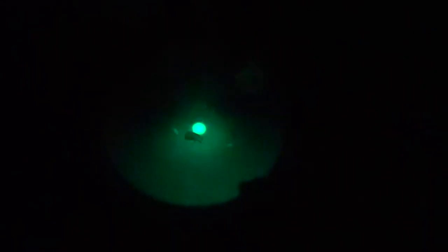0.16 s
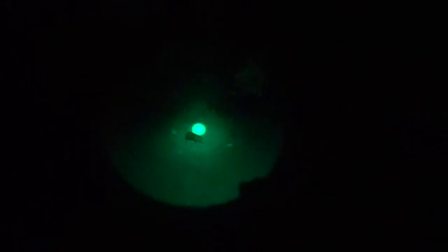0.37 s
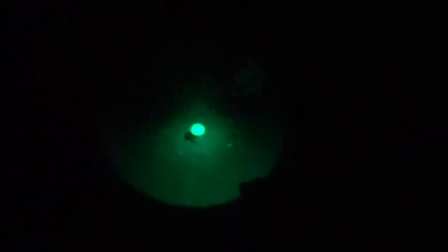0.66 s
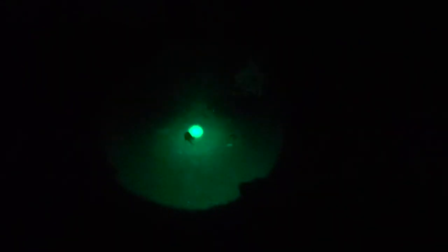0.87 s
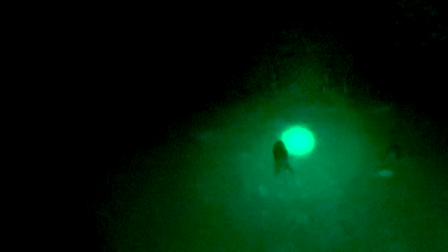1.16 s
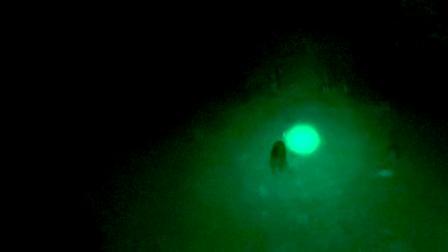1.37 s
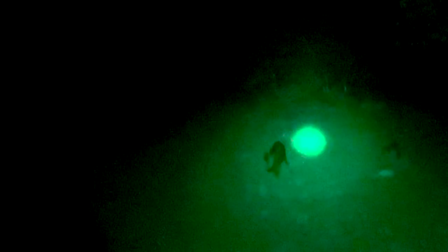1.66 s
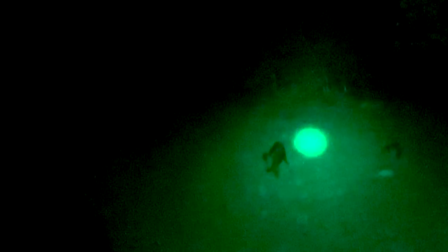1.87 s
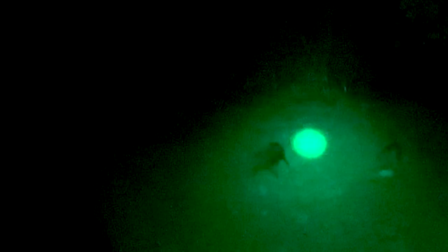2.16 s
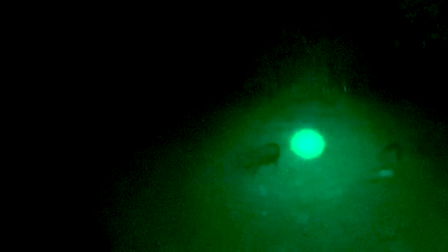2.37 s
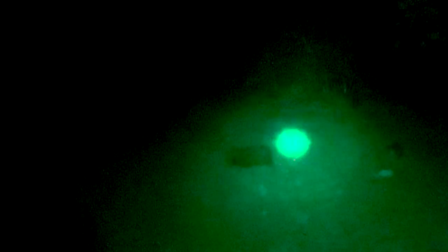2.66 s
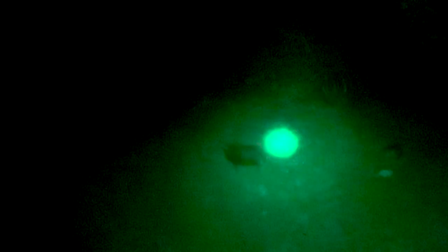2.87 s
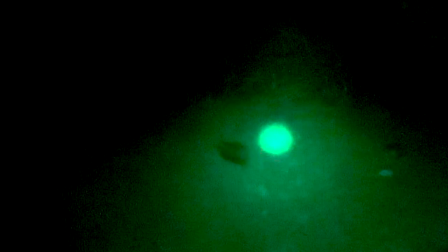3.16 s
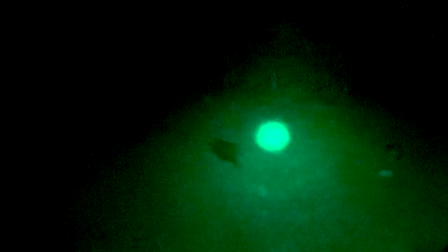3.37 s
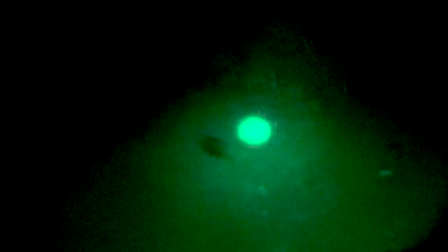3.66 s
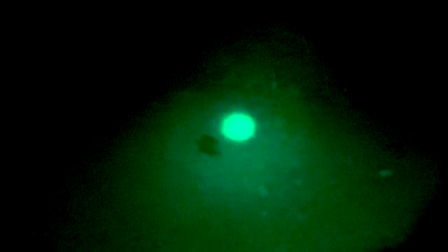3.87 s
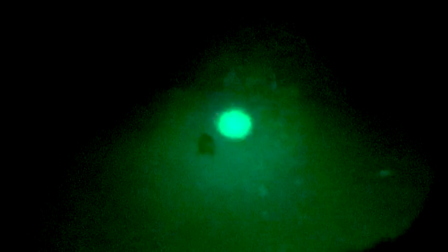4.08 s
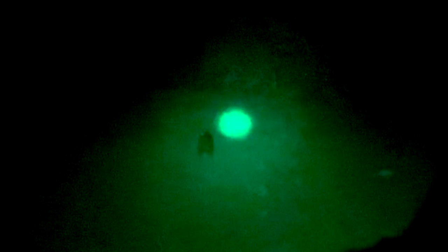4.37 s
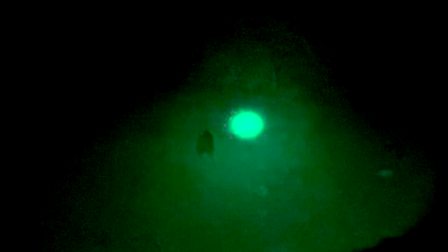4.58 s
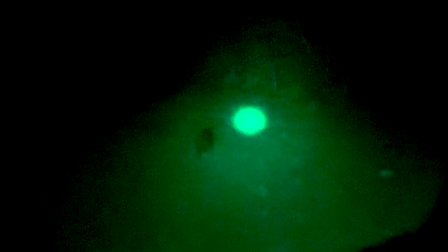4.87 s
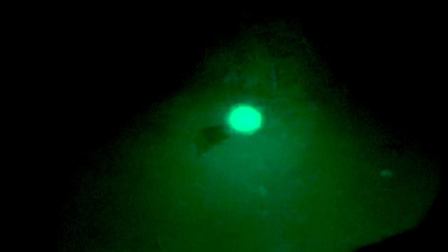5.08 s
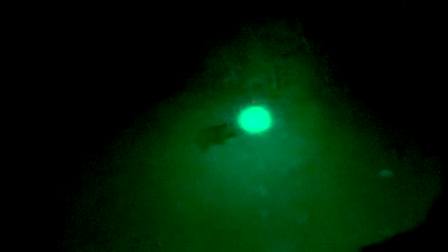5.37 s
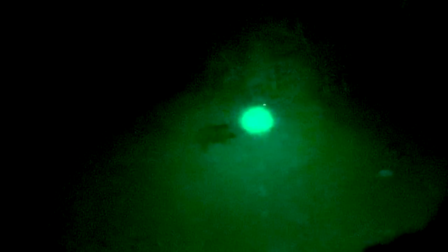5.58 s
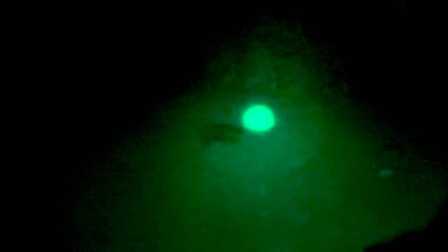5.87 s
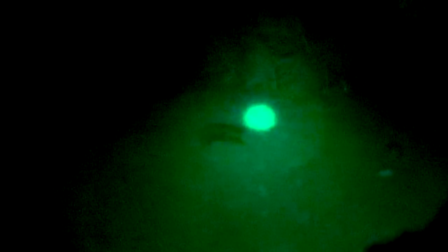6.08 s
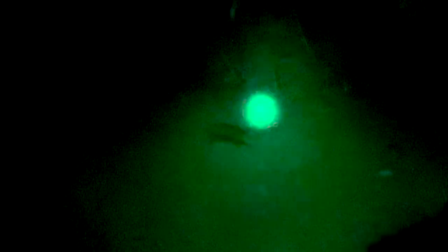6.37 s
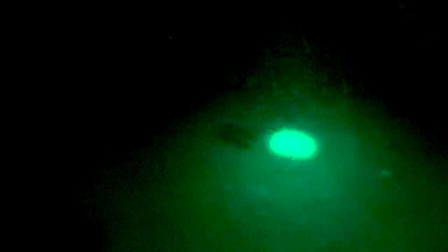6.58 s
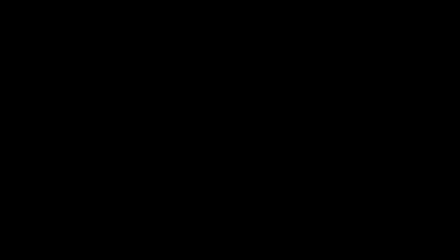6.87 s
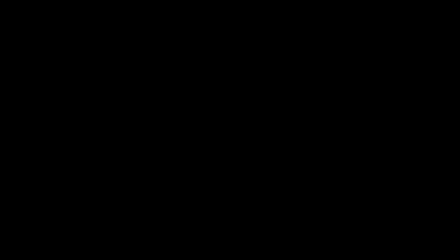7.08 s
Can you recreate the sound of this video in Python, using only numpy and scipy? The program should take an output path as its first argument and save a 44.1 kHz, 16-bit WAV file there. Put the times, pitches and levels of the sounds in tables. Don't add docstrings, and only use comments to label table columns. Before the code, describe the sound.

Stereo outdoor sound, mostly very quiet: dry leaf rustles, small crunches, low hoof scuffs and occasional breathy grunts beneath faint insects and distant rumble. A twig breaks crisply. Near the end comes a huge bright bow release with clattering limbs right beside the microphone, then a slightly farther shaft crack and dull flank thud, then three rapid, rising, rough whistling squeals with short woodland reverberation and startled hooves.

```python
import sys
import numpy as np
from scipy import signal
from scipy.fft import rfft, irfft, next_fast_len
from scipy.io import wavfile
from scipy.ndimage import uniform_filter1d

SR = 44100
rng = np.random.default_rng(int(sys.argv[2]) if len(sys.argv) > 2 else 0)


def dump_mix(stems):
    frames = np.atleast_2d(stems).T
    limited = np.clip(frames, -1, 1)
    pcm = np.round(limited * 32767).astype(np.int16)
    wavfile.write(sys.argv[1], SR, pcm)


def invert_db(x):
    u = np.asarray(x, float) / 20
    return 10 ** u


N = 318385
SIZE = next_fast_len(N + SR)
HZ = np.maximum(np.arange(SIZE // 2 + 1) * SR / SIZE, 1)

# start_s, snap_db, limb_blow_db
BOW = [
    (6.3425, -5.5, -36),
    (6.3445, -14, -46),
    (6.3575, -6, -18),
    (6.36, -16, -31),
    (6.364, -7, -13),
    (6.3665, -7, -4.5),
    (6.372, -30, -13),
    (6.3785, -30, -16.5),
    (6.385, -46, -35),
    (6.389, -21, -12),
]
# pitch_hz, level_db, t60_s
LIMB_MODES = [(165, -18.5, .05), (215, -18.0, .1), (232, -29.0, .26), (300, -23.0, .035), (505, -13.0, .06),
              (595, -10.5, .052), (660, -18.0, .04), (760, -14.0, .04), (840, -12.0, .055),
              (1160, -24.0, .03), (1500, -16.0, .018)]
# pitch_hz, width_hz, level_db
SNAP_BANDS = [(2400, 1400, 2.5), (6440, 1100, 1), (8170, 1900, 0), (15200, 1100, -6), (13400, 3000, -25)]
# start_s, snap_db, thud_db
STRIKE = [
    (6.5562, -15, -18),
    (6.561, -47.5, -8),
    (6.565, -46, -16.5),
    (6.5685, -40, -13),
    (6.575, -29, -25),
    (6.606, -35, -21.5),
]
# pitch_hz, width_hz, level_db
SHAFT_BANDS = [(1800, 640, -4.5), (4200, 900, -0.5), (6340, 800, 2), (7300, 1000, 4.5), (8760, 1450, -1.5),
               (15000, 1300, -10)]
# pitch_hz, level_db, t60_s
FLANK_MODES = [(115, -7.5, 0.055), (350, -25, .02), (173, -23, 0.0085), (256.5, -10, 0.071),
               (440, -16, 0.0051), (595, -16, 0.014)]
# start_s, pitch_hz, level_db
WHISTLE = [
    [(6.632, 1600, -75.5), (6.652, 1810, -10), (6.667, 1881, -5.5), (6.686, 2000, -2.5), (6.7, 2130, -4.5),
     (6.735, 2256, -10.5), (6.76, 2210, -20), (6.79, 2174, -34), (6.83, 2150, -36)],
    [(6.9, 1500, -47), (6.92, 1671, -17), (6.94, 1934, -18), (6.952, 2096, -2), (6.968, 2255, -16),
     (6.99, 2261, -18.5), (7.005, 2151, -13.5), (7.03, 2000, -6.5), (7.048, 1880, -22)],
    [(7.058, 2110, -19), (7.082, 2136, -15.5), (7.092, 2369, -14.5), (7.105, 2395, -11), (7.14, 2360, -21),
     (7.155, 2344, -16.5), (7.175, 2300, -27), (7.2, 2315, -25), (7.22, 2160, -13.5)],
]
# start_s, pitch_hz, level_db
VOICE = [
    [(6.63, 480, -66), (6.65, 501.3, -25.5), (6.68, 526.7, -24), (6.71, 544.7, -28.5), (6.75, 518, -37.5),
     (6.8, 499, -51.5)],
    [(6.95, 448.6, -42.5), (6.975, 489.6, -26.5), (6.99, 550, -19), (7.035, 570.4, -19),
     (7.095, 592.6, -24.5), (7.14, 557, -22), (7.165, 573.6, -33), (7.195, 586.5, -26), (7.22, 543.3, -17)],
]
# pitch_hz, width_hz, level_db
THROAT_BANDS = [(417, 150, -5), (563, 66, 4), (943, 82, -4.5), (1500, 230, 3), (2150, 950, 5.5),
                (2880, 92, -14), (4200, 330, -2.5), (6400, 200, -4.5), (6750, 330, -4.5), (9200, 1200, -10),
                (14000, 1200, -38)]
OVERTONES_DB = [-3.5, -22.5, -27, -35]
# multiple_of_voice, level_db
CLEAR_PARTIALS = [(.5, -24.5), (1, -2), (2, -5.5), (2.5, -8.5), (3, -15), (3.5, -20), (4, -11), (5, -21)]
# start_s, length_s,
# first_hz, last_hz, level_db
STRANDS = [(6.639, 0.03, 1590, 1620, -17), (6.645, .06, 2290, 2380, -14), (6.642, 0.064, 3900, 3820, -28),
           (6.839, .035, 1420, 980, -39.5), (6.922, 0.036, 3560, 3740, -23), (6.96, 0.022, 940, 1050, -25),
           (6.99, .062, 2188, 1490, -24), (6.7, .06, 2110, 2130, -17), (6.65, .045, 5550, 5700, -33),
           (6.645, .035, 7250, 7200, -35), (6.66, .055, 8350, 8600, -33), (6.66, .04, 6250, 6350, -35),
           (6.922, .03, 7400, 7450, -37), (6.995, .06, 6400, 6150, -28), (7.085, .06, 7150, 7650, -34),
           (7.105, .055, 5270, 5300, -28), (7.095, .055, 2880, 2900, -27), (7.185, .034, 2950, 2830, -28),
           (7.185, .034, 4650, 4550, -30), (7.195, .024, 7400, 7400, -36), (7.02, .04, 3100, 3050, -25),
           (6.655, .06, 3150, 3250, -27), (6.9, .09, 300, 330, -46), (7.185, .025, 2400, 2350, -17),
           (1.545, .085, 1440, 1460, -57), (1.73, .13, 1430, 1600, -56), (1.79, .06, 2050, 2300, -60),
          (1.17, .1, 400, 260, -60), (1.53, .1, 200, 300, -53), (6.635, .045, 1930, 2090, -15),
          (6.665, .05, 1680, 1850, -18), (6.66, .03, 1480, 1460, -27), (6.645, .055, 520, 390, -25),
          (6.625, .11, 640, 620, -36), (6.645, .09, 310, 300, -37), (6.675, .045, 1830, 1790, -17),
          (6.69, .06, 1620, 1600, -24), (6.69, .03, 2700, 2750, -24), (6.995, .035, 2470, 2250, -20),
          (7.01, .06, 1170, 1200, -21), (7.11, .05, 1140, 1090, -21), (7.09, .08, 1430, 1380, -30),
          (7.18, .039, 1420, 1450, -27), (6.97, .05, 1420, 1380, -25), (6.94, .03, 4000, 4400, -30),
          (7.01, .04, 5900, 5800, -30), (7.005, .05, 6700, 6600, -32)]
# start_s, peak_db, chest_db
GRUNTS = [
    (0.229, -61.5, -58),
    (0.634, -56, -54),
    (1.125, -57.5, -57),
    (1.221, -55, -65),
    (1.61, -68, -54),
    (5.516, -62, -45.5),
    (5.541, -47, -63),
    (5.566, -47.5, -44.5),
    (5.615, -56, -41),
]
# pitch_hz, level_db, t60_s
SNOUT_MODES = [(325, 2.5, 0.013), (480, -11, 0.017), (555, -11.5, 0.08), (1710, -3, 0.018),
               (2070, -9.5, 0.029)]
# start_s, peak_db, ring_hz, left_minus_right_db, bright_db
CRACKS = [(0.041, -34, 800, 5, -78), (0.098, -46, 1200, 12, -71), (0.193, -48.5, 1380, 5, -56.5),
          (0.22, -50, 557, -2, -37), (0.631, -60, 297, 1.5, -53), (0.739, -44.5, 1670, 2.0, -33),
          (1.065, -47, 1340, 2.0, -35), (1.1247, -38, 1710, -4, -60), (1.387, -48, 1320, 9, -66),
          (1.475, -52, 374, 9, -66), (1.6433, -21.5, 2850, 5, -20.5), (1.663, -28.5, 2900, 2, -41),
          (1.648, -33.5, 1230, 3, -70), (1.666, -42, 790, 0, -70), (1.129, -45, 330, 0, -72),
          (1.389, -51, 420, 0, -70), (1.48, -49, 1700, 2, -60), (1.088, -45.5, 1420, 2, -70),
          (3.034, -30, 14800, 0, -47), (1.6468, -31, 2400, -5, -22), (2.415, -47.5, 560, 2.0, -35),
          (2.465, -49, 1620, -4, -45), (2.48, -29.5, 3820, -1, -51.5), (2.978, -51, 2000, -1, -28),
          (2.992, -49, 2020, -3, -36), (3.035, -38, 4200, -2, -22.5), (3.114, -47.5, 1640, -3, -29),
          (3.15, -48, 1430, 1.5, -41), (3.456, -44.5, 1620, -3, -64), (5.567, -39.5, 1880, -2, -70)]
# time_s, level_db
BUSTLE = [(0, -58.5), (.8, -52), (1.4, -60.5), (1.75, -50.5), (1.97, -54), (2.55, -52), (2.95, -48),
          (3.25, -49), (4.2, -58), (4.45, -79), (5.3, -66), (6.1, -70), (6.33, -55.5), (6.6, -39),
          (6.88, -34.5), (7.22, -39.5)]
# start_s, rustle_db, scuff_db, ground_hum_db
STEPS = [(.05, -68, -59, -55.5), (1.0, -63, -62, -55.5), (1.39, -71, -67, -59), (2.35, -71, -88, -67),
         (2.78, -67, -59, -60), (3.53, -64, -70, -66), (4.5, -64, -79, -67), (4.76, -73, -77, -63),
         (.21, -72, -62, -56), (.46, -54, -59, -68), (.63, -45, -56.5, -56.5), (3.98, -57, -79, -57.5),
         (3.93, -70, -70, -63), (4.04, -70, -68, -58), (2.31, -70, -75, -56), (2.68, -70, -60, -61),
         (4.92, -75, -77, -66), (.75, -70, -70, -60.5), (1.13, -71, -55, -54.5), (1.24, -70.5, -62, -66),
         (1.57, -66, -57, -51.5), (1.72, -49, -51.5, -53), (1.81, -46, -49, -59), (2.05, -41.5, -53, -61),
         (2.18, -42, -58, -74), (2.26, -50.5, -58, -59.5), (2.47, -43.5, -57, -66), (2.9, -46.5, -60, -82),
         (3.03, -41.5, -73, -74), (3.14, -43.5, -57, -78), (3.45, -63, -64, -75),
         (3.6, -43.5, -55.5, -60.5), (3.82, -45, -66, -75), (4.09, -47.5, -73, -70), (4.355, -54, -77, -87),
         (4.89, -53, -64, -75), (5.19, -52.5, -80, -71), (5.58, -55, -63, -55), (5.7, -46, -61, -60),
         (5.98, -47.5, -59.5, -61), (6.21, -48, -61, -81)]
# start_s, rustle_db, scuff_db
TWIG = [
    (1.646, -33.5, -37.5),
    (1.665, -35, -51),
]
# start_s, hum_db, rumble_db
BOLTS = [
    (6.4, -40, -60),
    (6.58, -39, -58),
    (6.69, -41, -61),
    (6.86, -50, -51.5),
    (7.02, -65, -47.5),
    (7.21, -43, -48),
]
# pitch_hz, level_db
LEAF_COLOUR = [(710, -19.5), (1200, -15.5), (2020, -33), (2770, -28), (3190, -11), (4140, -9.5),
               (5320, -11.5), (8310, -7), (9880, -13), (10600, -15), (10900, -56), (12800, -9),
               (14900, -23), (16100, -12)]
# pitch_hz, width_hz, level_db, left_minus_right_db
INSECT_BANDS = [(4214, 465, -57.5, 13), (8380, 340, -71, -21.5), (1417, 270, -74, 17.5)]
# pitch_hz, level_db
NIGHT_COLOUR = [(15, -46), (25, -8), (80, 0), (439, -38.5), (887, -27.5), (1400, -26.5), (2480, -28),
                (3520, -23), (4140, -5.5), (4870, -24.5), (8590, -21), (10100, -28), (11000, -41),
                (14800, -36), (16000, -57)]
# pitch_hz, likeness
LIKENESS = [(60, 1), (200, 0.49), (600, 1), (1400, 0.052), (4000, 0.18), (9000, 0.016)]
# pitch_hz, left_minus_right_db
PORT_LEAN = [(60, 1), (130, 0), (290, 3), (640, 4.5), (1410, 1.5), (3100, 2.5), (6820, -2), (15000, -0.5)]
# pitch_hz, left_minus_right_db
BOW_LEAN = [(300, -3), (860, 6.5), (1400, 10.5), (2400, 3), (4500, 3.5), (5700, 11), (7600, -1.5),
            (15000, 1.5)]
# pitch_hz, left_minus_right_db
HOG_LEAN = [(60, 9), (150, 4), (380, -7), (950, 9), (2380, -5.5), (5980, 1), (15000, -12)]
# pitch_hz, right_leads_rad
BOW_TURN = [(120, 0), (300, -.1), (860, -.4), (1400, .5), (3000, .7), (5500, 1.4), (6500, 0), (10000, 2)]
# pitch_hz, right_leads_rad
HOG_TURN = [(120, 0), (300, -.3), (860, -.8), (1400, -.15), (2450, -.4), (2950, -2.9), (3300, -3.1),
            (4200, -2.2), (5100, -3.1), (5600, -6), (10000, -6.6)]
# start_s, end_s
SUDDEN = [
    (1.635, 1.685),
    (3.025, 3.045),
    (6.32, 6.42),
    (6.548, 6.565),
    (6.68, 6.69),
]

HUM_RISE_DB_PER_S, BOLT_FALL_DB_PER_S = 168, 86


def rms_one(x):
    return x / np.sqrt(np.mean(x ** 2) + 1e-20)


def in_time(rows):
    s, *columns = np.transpose(rows)
    return [np.interp(np.arange(N) / SR, s, c) for c in columns]


def at_hz(points):
    hz, values = np.transpose(points)
    return np.interp(np.log(HZ), np.log(hz), values)


def filtered(x, response):
    return irfft(rfft(x, SIZE) * response, SIZE)[..., :N]


def panned(pan_db):
    return invert_db([[pan_db / 2], [-pan_db / 2]])


def drift(rate_hz):
    r = np.exp(-2 * np.pi * rate_hz / SR)
    return rms_one(signal.lfilter([1], [1, -2 * r, r * r], rng.standard_normal(N + SR))[SR:])


def ring(hits, modes):
    out = 0
    for hz, level_db, t60 in modes:
        r, w = invert_db(-60 / (t60 * SR)), 2 * np.pi * hz / SR
        mode = signal.lfilter([0, np.sin(w)], [1, -2 * r * np.cos(w), r * r], hits + 1e-18)
        out = out + invert_db(level_db) * mode
    return out


def resonate(x, bands):
    out = 0
    for k, (hz, width, level_db) in enumerate(bands):
        r, w = np.exp(-np.pi * width / SR), 2 * np.pi * hz / SR
        feed = (1 - r * r) / 2
        band = signal.lfilter([feed, 0, -feed], [1, -2 * r * np.cos(w), r * r], x + 1e-18)
        out = out + (-1) ** k * invert_db(level_db) * band
    return out


def clicks(rows, column):
    rows = np.array(rows)
    out = np.zeros(N)
    out[(rows[:, 0] * SR).astype(int)] = invert_db(rows[:, column])
    return out


def burst(hits, t60):
    envelope = signal.lfilter([1], [1, -invert_db(-60 / (t60 * SR))], hits + 1e-18)
    return envelope * rng.standard_normal(N)


def swells(rows, column, rise, fall, bed_db):
    at = np.arange(0, N, 64)
    since = at / SR - np.array(rows)[:, :1]
    peaks_db = np.array(rows)[:, column, None]
    power = invert_db(2 * (peaks_db + np.minimum(rise * since, -fall * since))).sum(axis=0)
    bed = (bed_db + np.zeros(N))[at]
    return np.interp(np.arange(N), at, 10 * np.log10(power + invert_db(2 * bed)))


def spread(mid, side, colour):
    alike = at_hz(LIKENESS)
    mid = rfft(mid, SIZE) * np.sqrt(1 + alike)
    side = rfft(side, SIZE) * np.sqrt(1 - alike)
    left_lag_s = .0005
    lag = np.exp(-2j * np.pi * HZ * left_lag_s * (HZ > 200) * [[1], [0]])
    ports = np.array([mid + side, mid - side]) * lag * panned(at_hz(PORT_LEAN)).reshape(2, -1)
    return rms_one(irfft(ports * colour, SIZE)[:, :N])


def placed(x, lean, turn, scatter_db, woods_db, t60):
    t = np.arange(SR) / SR
    noise = rng.standard_normal((3, SR))
    scatter = noise[0] * np.exp(-t / .0015) * invert_db(scatter_db - 12)
    near = rfft(scatter, SIZE).imag * [[1j], [-1j]]
    far = noise[1:] * invert_db(-60 * t / t60) * np.clip(t / 0.0067, 0, 1) * invert_db(woods_db - 41.5)
    small = 1 / (1 + (600 / HZ) ** 3)
    response = np.exp(small * near) + small * rfft(far, SIZE) / (1 + HZ / 5000)
    phase = np.exp(1j * at_hz(turn) * [[-.5], [.5]])
    return filtered(x, response * phase * invert_db(small * at_hz(lean) * [[.5], [-.5]]))


def blow(rows, modes, snap, snap_t60, rattle, crunch_db):
    snaps = burst(clicks(rows, 1), snap_t60) + invert_db(-25) * burst(clicks(rows, 1), 0.16)
    pushes = clicks(rows, 2) + rattle * burst(clicks(rows, 2), 0.065)
    crunch_bands = [(614, 240, crunch_db), (2000, 840, crunch_db - 11)]
    crunch = resonate(burst(clicks(rows, 2), 0.094), crunch_bands)
    highpass = signal.butter(2, 90, "high", fs=SR, output="sos")
    body = signal.sosfilt(highpass, ring(pushes, modes))
    return invert_db(8.5) * resonate(snaps, snap) + body + crunch


def bow():
    return blow(BOW, LIMB_MODES, SNAP_BANDS, 0.0071, rattle=0.2, crunch_db=7.5)


def arrow_strike():
    return blow(STRIKE, FLANK_MODES, SHAFT_BANDS, 0.016, rattle=0.086, crunch_db=-3.5)


def low_voice(cycles, weak, breath):
    uneven = 1 - weak * (np.floor(cycles) % 2)
    pulses = np.diff(np.floor(cycles), prepend=0) * uneven * invert_db(2 * drift(200))
    puffs = np.exp(-3 * (cycles % 1)) * uneven * rng.standard_normal(N)
    drive = 0.34 * rms_one(pulses) + 0.68 * rms_one(puffs)
    throat = resonate(drive, THROAT_BANDS) * invert_db(0.38 * drift(60))
    flicker, clear = drift(62), 0
    for k, level_db in CLEAR_PARTIALS:
        own_flicker = np.roll(flicker, int(k * 9000))
        clear = clear + invert_db(level_db + (2 + 0.54 * k) * own_flicker) * np.sin(2 * np.pi * k * cycles)
    return breath * invert_db(6.5) * rms_one(throat) + (1 - breath) * invert_db(1.5) * clear


def whistle(pitch_hz, beat):
    jitter = (.004 + .013 * beat) * drift(250)
    turn = 2 * np.pi * np.cumsum(pitch_hz * (1 + jitter)) / SR
    tone = 0
    for k, level_db in enumerate(OVERTONES_DB):
        level = invert_db(level_db + k ** .5 * 4 * drift(50))
        tone = tone + level * np.sin((k + 1) * turn + .6 * k * drift(300))
    return tone


def squeal():
    # weakness of every other pulse, breath share, beating per dB of low voice
    per_call = [(0.091, 0.84, -0.96), (0.28, 0.42, 0.1)]
    rows = [(*row, *own) for call, own in zip(VOICE, per_call) for row in call]
    low_hz, low_db, weak, breath, grip = in_time(rows)
    cycles = np.cumsum(low_hz * (1 + .021 * drift(120) + .02 * drift(25))) / SR
    high_hz, high_db = in_time([row for call in WHISTLE for row in call])
    beat = np.clip(grip * (low_db + 42.5), .1, 1)
    wobble = drift(50)
    pairs = np.pi * cycles * 1.15 + 0.73 * wobble
    beating = 1 + beat * (0.92 * np.cos(pairs) + .5 * np.cos(2 * pairs) + .5 * drift(270))
    flutter_db = 2 * beat * wobble[::-1]
    started = np.arange(N) > VOICE[0][0][0] * SR
    call = started * invert_db(low_db) * low_voice(cycles, weak, breath)
    call = call + invert_db(high_db - 1.2 + flutter_db) * whistle(high_hz, beat) * beating
    dips = 1
    for hz in (3000, 3280, 5440):
        dips = dips * (1 - 0.5 / (1 + ((HZ - hz) / 56) ** 2))
    return filtered(call, dips)


def strands():
    attack_s, release_s, rough_db = 0.012, 0.0092, 2
    out, waver = np.zeros(N), drift(210)
    for s, length, first_hz, last_hz, level_db in STRANDS:
        t = np.arange(int(length * SR)) / SR
        at = int(s * SR) + np.arange(len(t))
        glide_hz = first_hz + (last_hz - first_hz) * t / length
        turn = 2 * np.pi * np.cumsum(glide_hz * (1 + 0.021 * waver[at])) / SR
        fade = np.clip(np.minimum(t / attack_s, (length - t) / release_s), 0, 1) ** 2
        roughness = invert_db(rough_db * np.roll(waver, 5000)[at])
        out[at] += invert_db(level_db) * fade * np.sin(turn) * roughness
    return out


def grunts():
    puffs = clicks(GRUNTS, 1) + 0.27 * burst(clicks(GRUNTS, 1), 0.083)
    chest = ring(clicks(GRUNTS, 2), [(74.8, 3.1, 0.56), (132, 1.3, 0.052)])
    return invert_db(1.5) * ring(puffs, SNOUT_MODES) + chest


def cracks():
    out, length = np.zeros((2, N)), 2000
    t = np.arange(length) / SR
    for s, level_db, hz, pan_db, bright_db in CRACKS:
        dull, *bright = rng.standard_normal((3, length))
        shell = [(hz, 0.23 * hz + 200, 0)]
        body = resonate(resonate(dull * np.exp(-t / 0.0035), shell), shell)
        body = invert_db(level_db) * body / np.abs(body).max() * panned(pan_db)
        splinter_bands = [(7200, 1900, bright_db + 1), (15000, 1400, bright_db - 20)]
        splinter = resonate(np.array(bright) * np.exp(-t / 0.0019), splinter_bands)
        i = int(s * SR)
        out[:, i:i + length] += body + splinter
    return out


def leaf_grains(column, bed_db, colour):
    level_db = swells(STEPS, column, 335, 190, bed_db)
    level_db = swells(TWIG, column, 5000, 350, level_db)
    sizes = invert_db(2.8 * np.minimum(rng.exponential(1, (2, N)), 4)) * rng.choice([-1, 1], (2, N))
    grains_per_s = 7000 * invert_db(3 * drift(40))
    grains = sizes * (rng.random((2, N)) < grains_per_s / SR)
    return invert_db(level_db) * spread(*grains, colour)


def leaves():
    bustle_db, = in_time(BUSTLE)
    scuff_db = -67.5 + 0.67 * (bustle_db - bustle_db.mean())
    rustle = leaf_grains(1, bustle_db, invert_db(at_hz(LEAF_COLOUR)))
    return rustle + leaf_grains(2, scuff_db, 1 / (1 + ((HZ - 1800) / 700) ** 2))


def insects():
    out = 0
    for hz, width, level_db, pan_db in INSECT_BANDS:
        strokes = (rng.random((2, N)) < 900 / SR) * rng.standard_normal((2, N)) * invert_db(0.51 * drift(30))
        band = [(hz, 0.85 * width, 0)]
        choir = rms_one(resonate(resonate(strokes, band), band))
        out = out + invert_db(level_db + 1.2 * drift(0.36)) * choir * panned(pan_db)
    return out


def night():
    bustle_db, = in_time(BUSTLE)
    mean_db = bustle_db.mean()
    hum_bed_db = -70 + 0.07 * (np.minimum(bustle_db, -50) - mean_db)
    hum_db = swells(STEPS, 3, HUM_RISE_DB_PER_S, 115, hum_bed_db)
    hum_db = swells(BOLTS, 1, 502, BOLT_FALL_DB_PER_S, hum_db) + 3.3 * drift(10.6)
    rumble_db = swells(BOLTS, 2, HUM_RISE_DB_PER_S, BOLT_FALL_DB_PER_S, -55.5)
    rumble_db = rumble_db + 1.5 * (drift(4.6) + .5 * drift(0.32))
    floor_db = -51 + 0.0094 * (bustle_db - mean_db)
    low = 1 / (1 + (HZ / 200) ** 4)
    mid = (1 - low) / (1 + (HZ / 700) ** 4)
    noise, colour = rng.standard_normal((2, N)), invert_db(at_hz(NIGHT_COLOUR))
    rumble = invert_db(rumble_db) * spread(*noise, colour * low)
    hum = invert_db(hum_db) * spread(*noise, colour * mid)
    return rumble + hum + invert_db(floor_db) * spread(*noise, colour * (1 - low - mid))


def scene():
    near = placed(bow(), BOW_LEAN, BOW_TURN, scatter_db=-4, woods_db=-12.5, t60=0.54)
    hogs = arrow_strike() + squeal() + strands() + grunts()
    far = placed(hogs, HOG_LEAN, HOG_TURN, scatter_db=-5, woods_db=0.5, t60=0.39)
    return near + far + cracks() + leaves() + insects() + night()


def masked_out(x):
    hz, _, frames = signal.stft(x, SR, "hann", 2048, 1024)
    bins = 11
    band = np.arange(len(hz)) // bins
    power = np.add.reduceat(np.abs(frames[0]) ** 2, np.arange(0, len(hz), bins))
    power = uniform_filter1d(power, size=2, axis=1)
    octaves = np.log2(hz[::bins] + 118)
    hiding = invert_db(-2 * 9 * np.abs(octaves[:, None] - octaves)) @ power
    total = power.sum(axis=0)
    loud_db = 10 * np.log10(total / np.median(total) + 1)
    waver = uniform_filter1d(rng.standard_normal(power.shape), size=2, axis=1)
    margin_db = 20.8 + .2 * loud_db + 3.5 * waver
    outside = np.abs(hz[::bins, None] - 7400) > 5100
    kept = (power > invert_db(-2 * margin_db) * hiding) | outside
    return signal.istft(frames * kept[band], SR, "hann", 2048, 1024)[1][:, :N]


def roll_off(x):
    return signal.sosfilt(signal.butter(12, 16270, fs=SR, output="sos"), x)


def record(dry):
    left, right = np.clip(dry, -1, 1)
    t = np.arange(N) / SR
    sudden = uniform_filter1d(sum(1. * (t > a) * (t < b) for a, b in SUDDEN), size=100)
    off_gap = (HZ - 11620) / 1150
    gap = (1 - .97 / (1 + off_gap ** 12)) / (1 + (HZ / 15900) ** 80)
    shallow_gap = 1 - .35 / (1 + off_gap ** 4)
    mid = (left + right) / 2
    mid = sudden * filtered(mid, shallow_gap) + (1 - sudden) * filtered(mid, gap)
    side = filtered((left - right) / 2, 1 / (1 + (HZ / 13500) ** 8))
    both = np.array([mid, side])
    mid, side = sudden * both + (1 - sudden) * masked_out(both)
    return roll_off(np.clip([mid + side, mid - side], -1, 1))


dry = scene()
out = record(dry)
dump_mix(out)
```